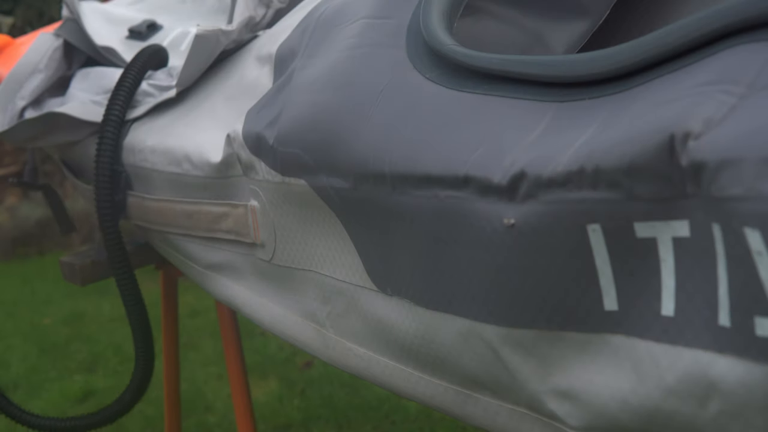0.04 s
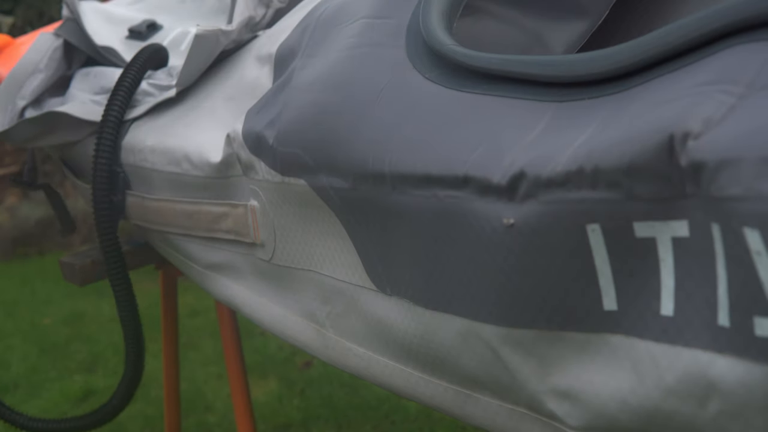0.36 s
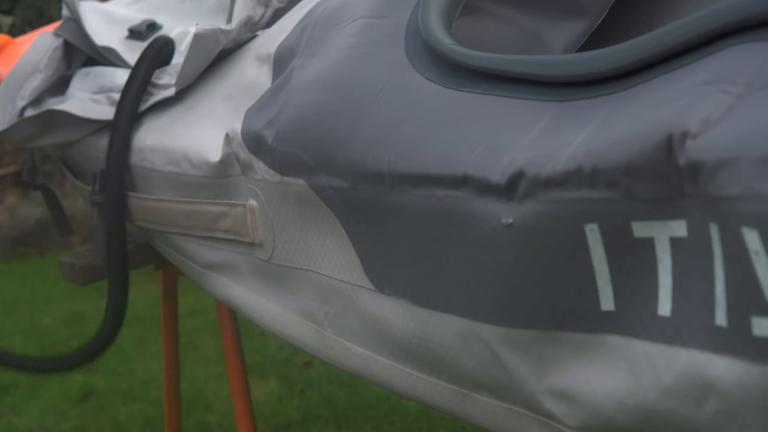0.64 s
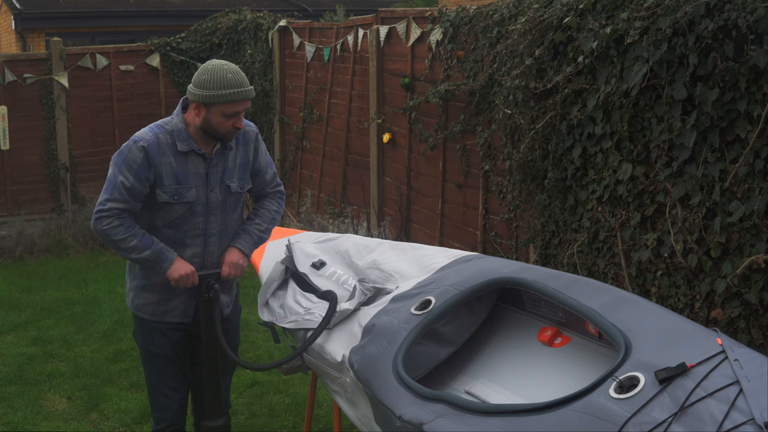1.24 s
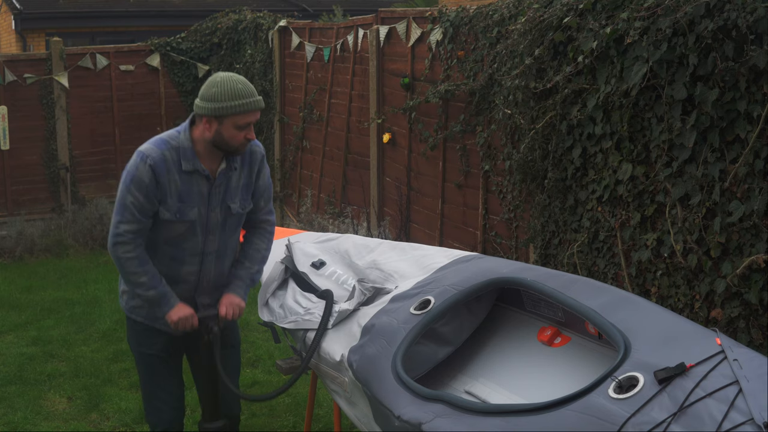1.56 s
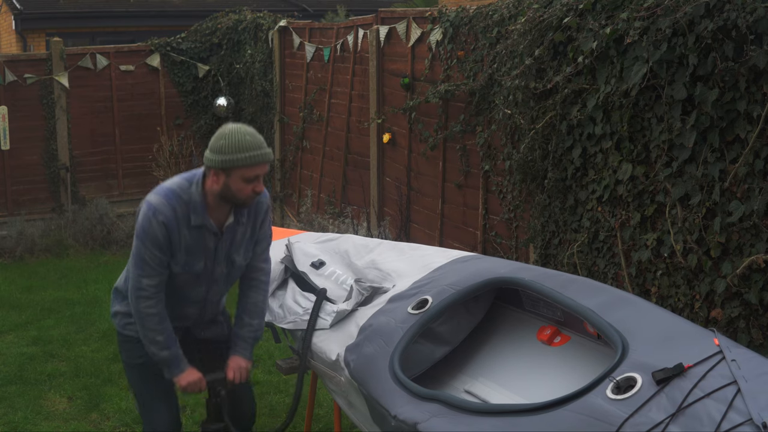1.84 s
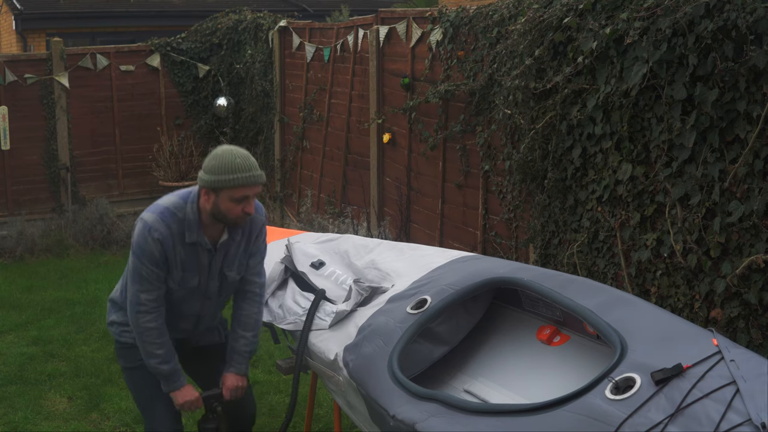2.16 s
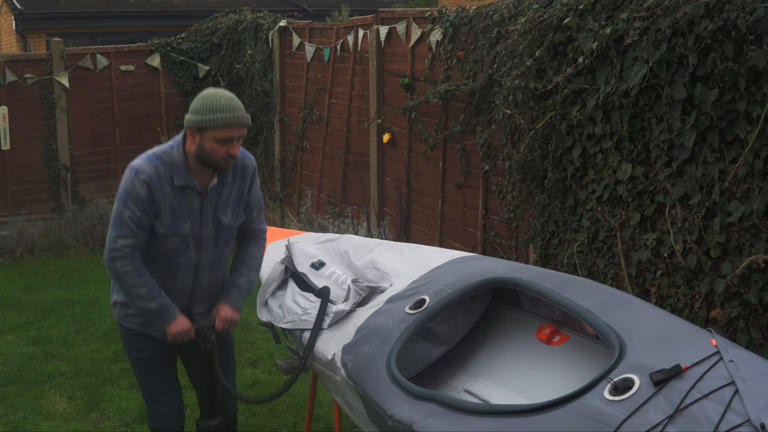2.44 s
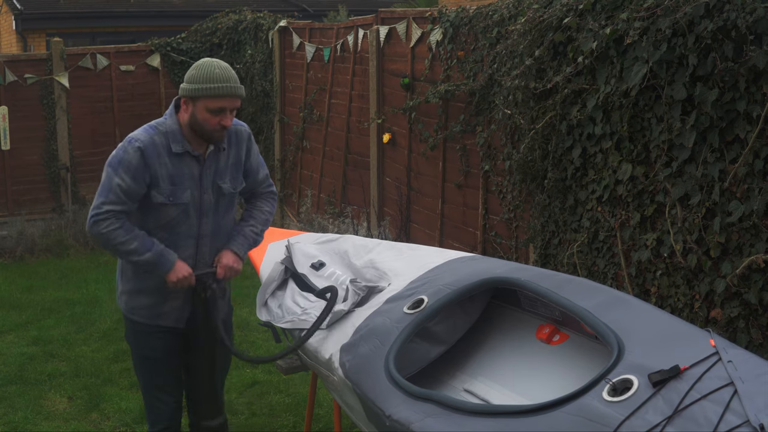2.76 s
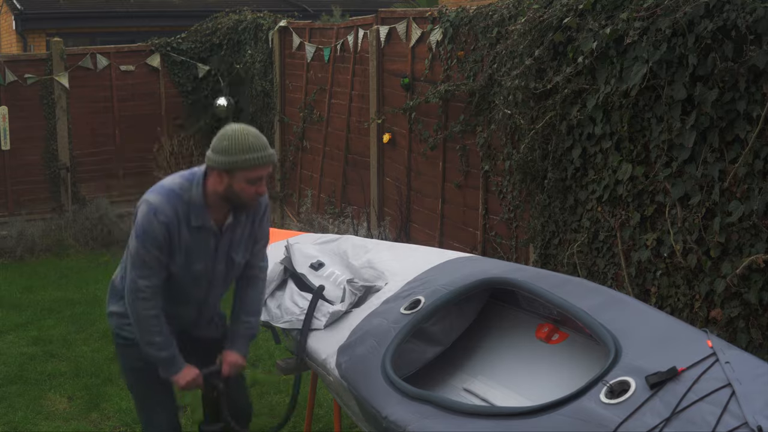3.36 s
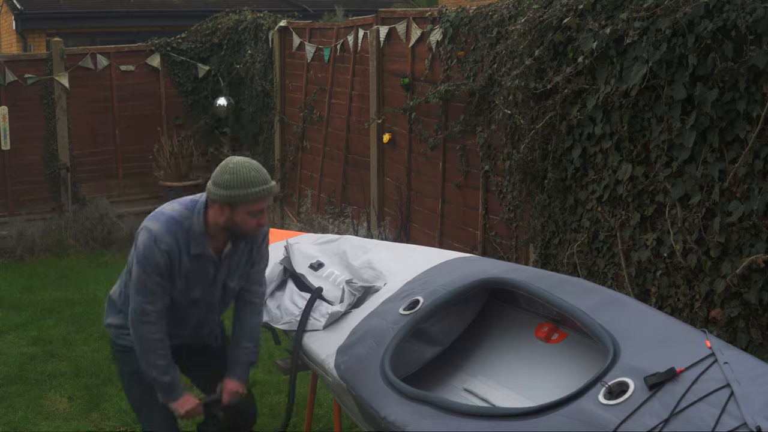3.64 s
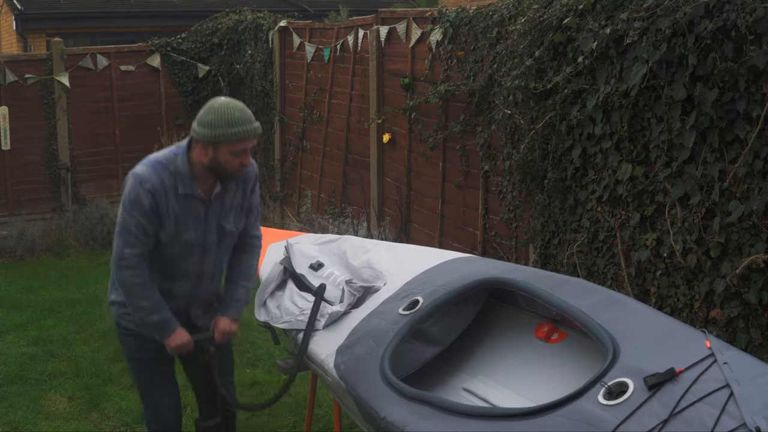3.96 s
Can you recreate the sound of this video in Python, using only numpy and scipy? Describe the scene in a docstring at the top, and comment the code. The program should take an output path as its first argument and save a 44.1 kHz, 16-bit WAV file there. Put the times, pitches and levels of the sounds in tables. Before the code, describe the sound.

Hand pump inflating a kayak, with hissing strokes of air and plastic knocks at each turn.

```python
"""A quiet garden: a double-action hand pump inflates a kayak.
Each pull and push sends air rushing through valves and a ribbed hose; the piston knocks at its end stops.
The barrel thumps under load and the plastic shaft pops, among scattered short ticks.
At the start the hull's cover rustles and the piston seal squeaks."""
import sys
import numpy as np
from scipy import signal
from scipy.fft import rfft, irfft
from scipy.io import wavfile
from scipy.ndimage import uniform_filter1d

SR = 44100
rng = np.random.default_rng(int(sys.argv[2]) if len(sys.argv) > 2 else 0)


def wrap_up_sound(samples):
    """Save the sound to the file named by the first command line argument, as 16-bit audio."""
    columns = np.atleast_2d(samples).T
    # keep every value between -1 and 1, then stretch to whole-number steps
    tamed = np.clip(columns, -1, 1)
    steps = np.round(tamed * 32767).astype(np.int16)
    wavfile.write(sys.argv[1], SR, steps)


N = 176400
T = np.arange(N) / SR

# piston end stops, top and bottom in turn: t/s, thud/dB, pitch ratio, clack/dB, clack f/Hz
END_STOPS = [(1.1074, -31.5, .97, -23, 1680), (1.9317, -31, 1.055, -18.5, 2050),
             (2.6520, -32.5, 1.016, -23, 2400), (3.5282, -37, 1.09, -34.5, 1770)]


def amp(db):
    """Decibels to gain."""
    return 10 ** (np.asarray(db) / 20)


def unit(x):
    """Scale to rms 1."""
    return x / np.sqrt(np.mean(x ** 2) + 1e-20)


def add(mix, start_s, sound):
    """Mix a sound in at start_s."""
    part = mix[max(round(start_s * SR), 0):][:len(sound)]
    part += sound[:len(part)]


def noise(spectrum):
    """Steady noise, rms 1, shaped by rows of f/Hz, level/dB."""
    hz, db = np.transpose(spectrum)
    f = np.fft.rfftfreq(N, 1 / SR)
    colour = amp(np.interp(np.log(f + 1), np.log(hz), db))
    return unit(irfft(rfft(rng.standard_normal(N)) * colour, N))


def wander(rate_hz):
    """Random drift, rms 1, rolling off above rate_hz."""
    f = np.fft.rfftfreq(N, 1 / SR)
    return unit(irfft(rfft(rng.standard_normal(N)) * (f > 2) / (1 + (f / rate_hz) ** 2), N))


def whistle(hz, width_hz):
    """Turbulence in a steep resonance, rms 1; hz may vary."""
    pole = np.exp(-np.pi * width_hz / SR)
    turbulence = rng.standard_normal(N) + 1j * rng.standard_normal(N)
    baseband = signal.lfilter([1], np.poly([pole, pole]), turbulence)
    carrier = np.exp(2j * np.pi * np.cumsum(hz * np.ones(N)) / SR)
    return unit((baseband * carrier).real)


def crack(db, hz, decay_s, width_oct=1):
    """Short noise burst centred on hz."""
    t = T[:4096]
    f = np.fft.rfftfreq(len(t), 1 / SR)
    colour = 1 / (1 + (np.log2((f + 1) / hz) / width_oct) ** 2) ** 2
    grain = unit(irfft(np.exp(2j * np.pi * rng.random(len(f))) * colour))
    return 2 * amp(db) * grain * np.minimum(t / 0.0003, 1) * np.exp(-t / decay_s)


def struck(modes, pitch_ratio, t):
    """Decaying modes of a struck part, alternating in sign."""
    return sum((-1) ** k * amp(db - 60 * t / t60_s) * np.sin(2 * np.pi * hz * pitch_ratio * t)
               for k, (hz, db, t60_s) in enumerate(modes))


def garden_air(db=-63.5):
    """Steady outdoor background."""
    # f/Hz, relative level/dB
    spectrum = [(24, -37), (45, -1.5), (438, -9), (949, -3), (2110, -13), (3140, -18.5), (15500, -28.5)]
    return amp(db) * noise(spectrum)


def garden_echo(x, wet_db=-23, t60_s=0.18, lowpass_hz=1500, delay_s=0.006):
    """Add faint, dull scatter from fence and hedge."""
    t = T[:SR // 3]
    tail = signal.lfilter(*signal.butter(1, lowpass_hz, fs=SR), rng.standard_normal(len(t)))
    tail *= amp(-60 * t / t60_s) * (t > delay_s)
    return x + amp(wet_db) * signal.fftconvolve(x, tail / np.linalg.norm(tail))[:N]


def hull_rustle(grain_db=2):
    """The hull's fabric cover shifts and crinkles."""
    # envelope: t/s, level/dB
    envelope = [(.0, -67), (.07, -61.5), (.2, -71.5), (.5, -66)]
    # f/Hz, relative level/dB
    spectrum = [(700, -10), (1300, 9), (3000, 6), (9000, -10)]
    t_s, db = np.transpose(envelope)
    return noise(spectrum) * amp(np.interp(T, t_s, db) + grain_db * wander(40)) * (T < t_s[-1])


def pump_rumble(hz=75, width_hz=190):
    """The pump rocks on the ground as it is worked."""
    # envelope: t/s, level/dB
    envelope = [(2.1, -75), (2.33, -61), (2.5, -73), (2.8, -63.5), (2.94, -52.5), (3.08, -67),
                (3.85, -60.5)]
    return whistle(hz, width_hz) * amp(np.interp(T, *np.transpose(envelope)))


def seal_squeak(jitter=0.024):
    """The seal chirps downward as the piston starts to move."""
    # glide: t/s, f/Hz, level/dB
    glide = [(.422, 3930, -62), (0.436, 3770, -58), (.447, 3840, -65), (.451, 3074, -56),
             (0.467, 2964, -55), (0.488, 2300, -60)]
    t_s, hz, db = np.transpose(glide)
    pitch_hz = np.interp(T, t_s, hz) * (1 + jitter * wander(500))
    envelope = amp(np.interp(T, t_s, db, left=-200, right=-200))
    return envelope * np.sin(2 * np.pi * np.cumsum(pitch_hz) / SR)


def chamber_note(db=-50.5, hz=2260, width_hz=75, decay_s=0.039):
    """The intake chamber rings on after each top stop."""
    envelope = sum((T > t_s) * np.exp(-abs(T - t_s) / decay_s) for t_s, *_ in END_STOPS[::2])
    return amp(db) * envelope * whistle(hz, width_hz)


def shaft_pop(db, hz, decay_cycles=0.265, highpass_hz=250):
    """One slip, a cycle or two long; the thin shaft radiates little bass."""
    cycles = T[:SR // 30] * hz
    age = cycles / decay_cycles
    slip = -amp(db) * age * np.exp(1 - age) * np.sin(2 * np.pi * cycles)
    return signal.sosfilt(signal.butter(2, highpass_hz, "highpass", fs=SR, output="sos"), slip)


def barrel_thump(db, hz, decay_s, rise_s=0.0018, flutter_db=2):
    """Soft, low ring as the barrel takes or sheds load."""
    t = T[:SR // 5]
    gain = amp(db + flutter_db * wander(180)[:len(t)])
    envelope = np.minimum(t / rise_s, 1) * np.exp(-np.maximum(t - rise_s, 0) / decay_s)
    return gain * envelope * np.sin(2 * np.pi * hz * t)


def piston_knock(thud_db, pitch_ratio, clack_db, clack_hz, contact_s=0.0017, rebound_s=0.0046):
    """The piston hits its stop and rebounds: the barrel thuds, the cap clacks."""
    # barrel modes: f/Hz, level/dB, t60/s
    barrel = [(126, -8.5, 0.072), (205, -1, 0.048), (337.4, 1.5, 0.045), (428.4, -3, 0.066),
              (696, 5.5, 0.016), (1027, 1, 0.013), (1300, -9, 0.079)]
    # hard plastic end cap modes: f/Hz, level/dB, t60/s
    cap = [(1555, 3.5, 0.015), (2070, -0.5, 0.013), (2500, -2, 0.014), (3400, -3, .024)]
    focus_db_per_oct, crack_s, limit_db = 9, 0.0019, -17
    t = T[:SR // 5]
    excited = [(hz, db - focus_db_per_oct * abs(np.log2(hz / clack_hz)), t60_s) for hz, db, t60_s in cap]
    hit = amp(thud_db) * struck(barrel, pitch_ratio, t)
    hit += amp(clack_db) * struck(excited, pitch_ratio, t) * np.minimum(t / contact_s, 1)
    add(hit, 0, crack(clack_db - 13, clack_hz, crack_s))
    add(hit, rebound_s, crack(clack_db - 16, clack_hz, crack_s))
    return amp(limit_db) * np.tanh(hit / amp(limit_db))


def hollow_rings(fade_s=0.039):
    """Resonances of intake chamber and hose, drifting as the piston moves."""
    # start t/s, end t/s, start f/Hz, end f/Hz, width/Hz, level/dB re rush gain
    resonances = [(0.529, 1.222, 2056, 2213, 148, 2), (.58, 0.837, 3540, 3097, 744, 0),
                  (0.827, 1.173, 1656, 1557, 500, 0.5), (2.035, 2.788, 2106, 2188, 138, 2),
                  (2.04, 2.16, 3730, 3560, 300, 4.5), (2.2, 2.631, 3440, 4094, 600, -3.5),
                  (3.17, 3.558, 2384, 2604, 550, 0.5), (3.678, 4.049, 6960, 6790, 700, -3)]
    rings = np.zeros(N)
    for start_s, end_s, start_hz, end_hz, width_hz, db in resonances:
        fade = np.clip(np.minimum(T - start_s, end_s - T) / fade_s, 0, 1)
        rings += amp(db) * fade * whistle(np.interp(T, [start_s, end_s], [start_hz, end_hz]), width_hz)
    return rings


def hose_colour(air, depth_db=1.8, corner_hz=7960):
    """The flexing hose lifts and dips narrow bands for about 0.1 s, less above corner_hz."""
    frames = dict(nperseg=1024, noverlap=768)
    hz, _, spectra = signal.stft(air, SR, **frames)
    patches = rng.standard_normal(spectra.shape)
    for _ in range(2):
        patches = uniform_filter1d(patches, size=5, axis=0)  # over frequency
        patches = uniform_filter1d(patches, size=16, axis=1)  # over time
    band_db = depth_db * unit(patches) / np.sqrt(1 + (hz[:, None] / corner_hz) ** 4)
    return signal.istft(spectra * amp(band_db), **frames)[1][:N]


def stroke(curve, edge_s=0.0055):
    """Rush, hiss and valve gains and valve f/Hz through one stroke."""
    t_s, *levels_db, valve_hz = np.transpose(curve)
    outside_s = np.maximum(np.maximum(t_s[0] - T, T - t_s[-1]), 0)
    gate = np.exp(-(outside_s / edge_s) ** 2)
    gains = [gate * amp(np.interp(T, t_s, db)) for db in levels_db]
    return *gains, np.interp(T, t_s, valve_hz)


def pull(curve, rush_trim_db=5, valve_trim_db=-4, width_hz=950, flutter_db=0.8):
    """Handle rises: air is sucked through the intake valve."""
    # intake rush: f/Hz, relative level/dB
    rush_spectrum = [(40, -29), (110, -13.5), (420, 0.5), (900, -3), (1250, 3.5), (2000, 5.5), (2900, 2.5),
                     (3700, 5.5), (5200, 0), (6200, 4), (7300, 1.5), (8500, -9), (11000, -25)]
    # intake hiss: f/Hz, relative level/dB
    hiss_spectrum = [(6000, -20), (8600, -9), (10000, -5), (11500, -2.5), (16000, -7.5)]
    rush, hiss, valve, valve_hz = stroke(curve)
    air = rush * amp(rush_trim_db) * noise(rush_spectrum) + hiss * noise(hiss_spectrum)
    air += valve * amp(valve_trim_db) * whistle(valve_hz, width_hz)
    return air * amp(flutter_db * wander(60))


def push(curve, rush_trim_db=4, valve_trim_db=-3, width_hz=1250, flutter_db=0.6, sputter_db=1):
    """Handle falls: air is forced past the outlet flap, which sputters between its limits."""
    # outlet rush: f/Hz, relative level/dB
    rush_spectrum = [(40, -30), (130, -21), (480, 7), (750, -8), (1100, 9), (1700, 10.5), (2350, 13),
                     (3300, 9), (3900, 7), (5500, 4.5), (6600, 6.5), (7800, 1), (12000, -4)]
    # outlet hiss: f/Hz, relative level/dB
    hiss_spectrum = [(6000, -35), (8600, 1), (11600, 9.5), (14500, 10.5), (16000, 5)]
    rush, hiss, valve, valve_hz = stroke(curve)
    air = rush * amp(rush_trim_db) * noise(rush_spectrum) + hiss * noise(hiss_spectrum)
    flap = amp(valve_trim_db - sputter_db * np.tanh(wander(300)))
    air += valve * flap * whistle(valve_hz, width_hz)
    return air * amp(flutter_db * wander(40))


def airflow():
    """All strokes through the hose, plus the resonances their rush excites."""
    # one curve per upstroke: t/s, rush/dB, hiss/dB, valve/dB, valve f/Hz
    pulls = [
        [(0.48, -87, -90, -57, 2370), (0.524, -66.5, -69, -61, 2630), (0.636, -52, -52, -41.5, 3274),
         (0.75, -48, -48, -37, 3165), (0.84, -50, -49, -44.5, 2835), (1.102, -53, -59.5, -44.5, 2593),
         (1.2, -90, -92, -77, 2340)],
        [(2.01, -76, -91, -78, 3146), (2.09, -60, -60, -51.5, 2589), (2.23, -50, -48.5, -40.5, 2400),
         (2.36, -47.5, -46, -45.5, 2378), (2.646, -53.5, -55, -45, 2500), (2.75, -82, -82, -71, 2440)],
        [(3.63, -77, -71, -72, 2620), (3.724, -61.5, -59.5, -48, 2462), (3.852, -50.5, -51.5, -44.5, 2838),
         (3.91, -53.5, -50, -43.5, 2650), (4.0, -51, -48, -41.5, 2630)],
    ]
    # one curve per downstroke: t/s, rush/dB, hiss/dB, valve/dB, valve f/Hz
    pushes = [
        [(1.255, -91, -88, -70, 1981), (1.285, -60, -71, -52.5, 2080), (1.345, -52.5, -64, -51.5, 1990),
         (1.48, -50.5, -57, -44, 1650), (1.71, -47, -48, -41, 1553), (1.83, -48.5, -51, -42.5, 1554),
         (1.928, -52.5, -59, -46, 1590)],
        [(2.83, -88, -65, -64, 2280), (2.864, -59, -82, -54, 2387), (3.064, -51.5, -56, -43, 2150),
         (3.276, -46, -48, -35.5, 2557), (3.506, -55, -64, -50, 2190), (3.62, -80, -68, -78, 1233)],
    ]
    air = sum(pull(curve) for curve in pulls) + sum(push(curve) for curve in pushes)
    rush_gain = sum(stroke(curve)[0] for curve in [*pulls, *pushes])
    return hose_colour(air) + hollow_rings() * rush_gain


def scene():
    """Pump and garden, mono on two channels."""
    # short ticks, the one at 1.25 s a faint, sharp click: t/s, level/dB, f/Hz
    ticks = [(0.051, -51, 1230), (0.057, -50, 2200), (0.078, -51, 1810), (.238, -63.5, 6100),
             (.3265, -49.5, 2860), (.335, -51.5, 1500), (1.2513, -59, 8200), (1.282, -59, 9000),
             (1.452, -43.5, 5600), (1.844, -40, 2600), (2.750, -61.5, 3430), (2.834, -55.5, 3120),
             (2.859, -51, 2920), (3.031, -35, 1290)]
    # shaft slips: t/s, level/dB, f/Hz
    pops = [(.3268, -37.5, 650), (.3652, -36.5, 507), (1.846, -24, 1410), (2.368, -34.5, 596),
            (2.541, -27.5, 660), (3.031, -21, 770), (3.176, -29.5, 510), (3.234, -25.5, 660),
            (3.3035, -27, 605), (3.401, -25, 1340), (3.7174, -29.5, 786), (3.804, -32, 1230)]
    # barrel load changes: t/s, level/dB, f/Hz, decay/s
    thumps = [(.592, -39.5, 197, 0.0059), (1.065, -51, 100, .012), (1.292, -45.5, 370, 0.0064),
              (1.349, -39, 180, 0.012), (1.937, -34, 116, 0.0042), (2.127, -36.5, 177, 0.0055),
              (2.657, -33.5, 340.7, 0.0019), (2.936, -35.5, 205, 0.006), (2.937, -45, 415, 0.011),
              (2.947, -32.5, 182, .017)]
    hits = np.zeros(N)
    for events, source in ((END_STOPS, piston_knock), (thumps, barrel_thump), (pops, shaft_pop)):
        for t_s, *settings in events:
            add(hits, t_s, source(*settings))
    for t_s, db, hz in ticks:
        add(hits, t_s, crack(db, hz, decay_s=0.0029))
    mono = airflow() + chamber_note() + pump_rumble()
    mono += garden_echo(hits + seal_squeak() + hull_rustle())
    mono += garden_air()
    return np.array([mono, mono])


def record(dry):
    """Low cut and steep band limit."""
    highpass_hz, lowpass_hz = 92, 15900
    low_cut = signal.butter(2, highpass_hz, "highpass", fs=SR, output="sos")
    band_limit = signal.firwin(601, lowpass_hz, window=("kaiser", 8), fs=SR)
    return signal.oaconvolve(signal.sosfilt(low_cut, dry), band_limit[None], "same")


dry = scene()
out = record(dry)
wrap_up_sound(out)
```